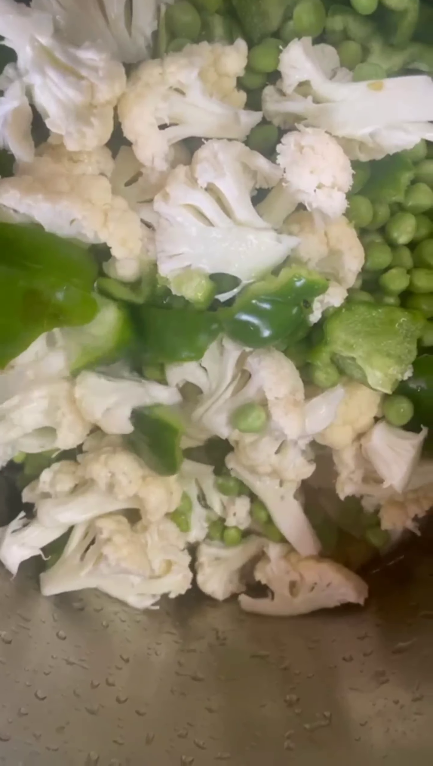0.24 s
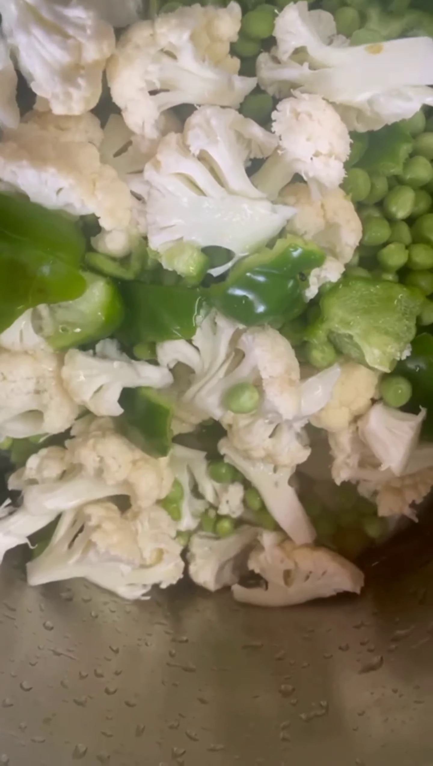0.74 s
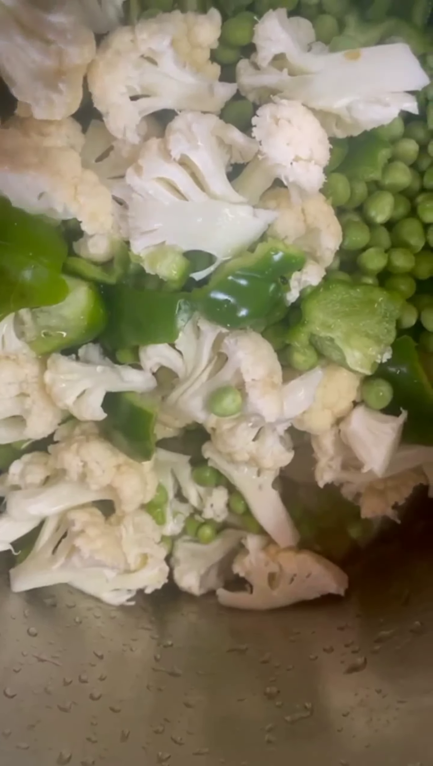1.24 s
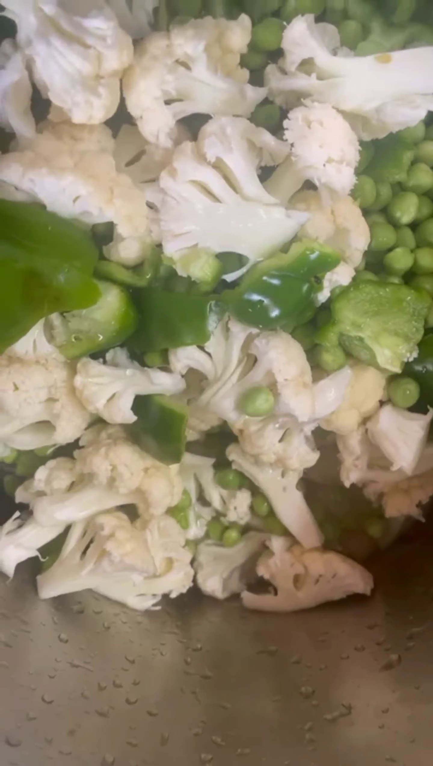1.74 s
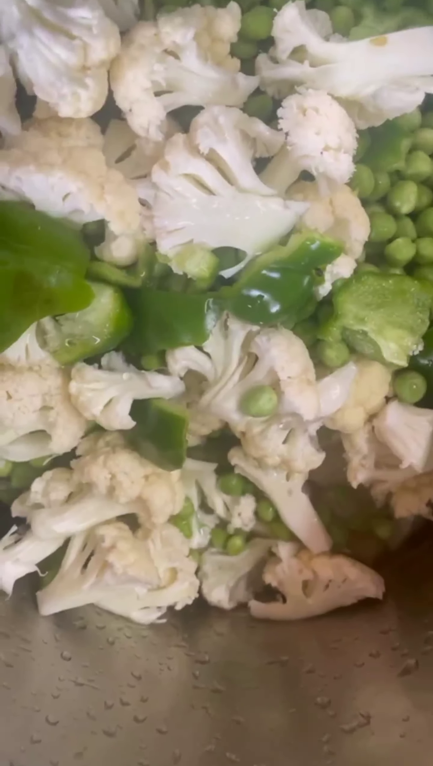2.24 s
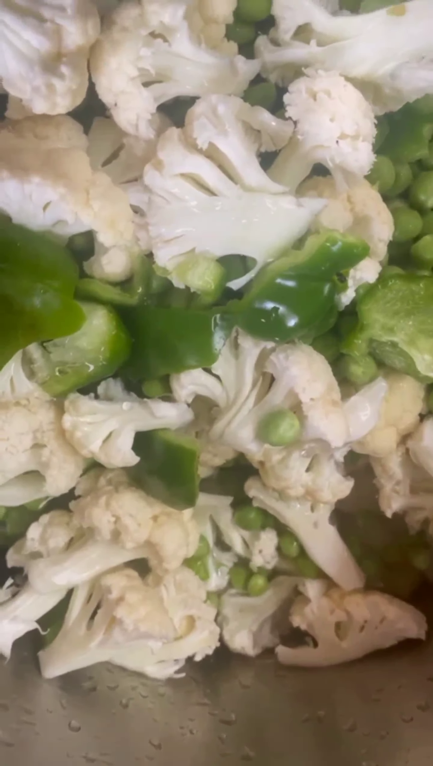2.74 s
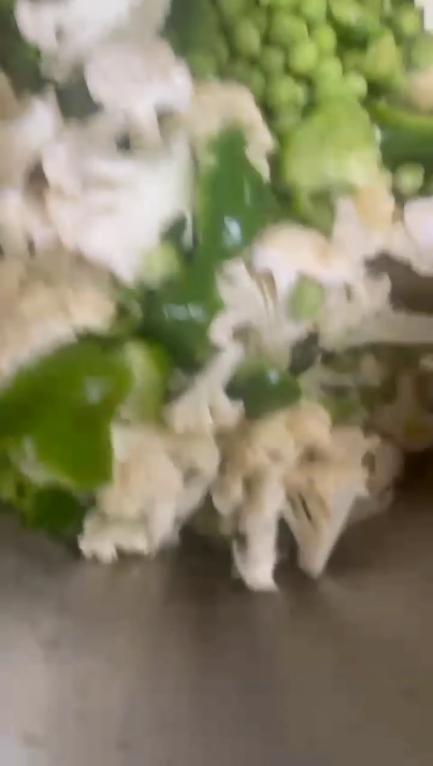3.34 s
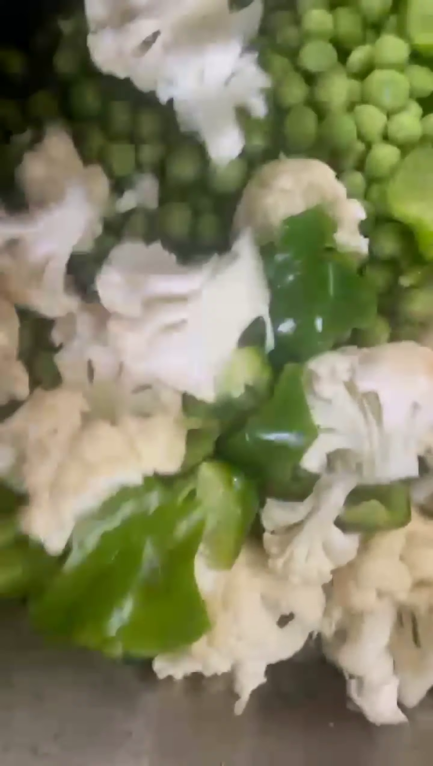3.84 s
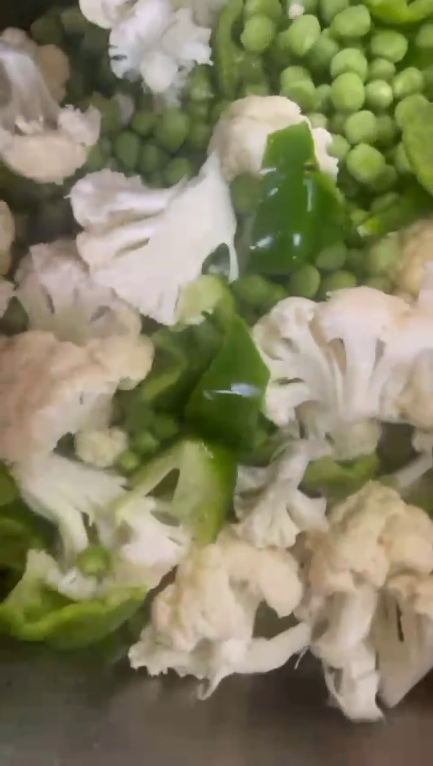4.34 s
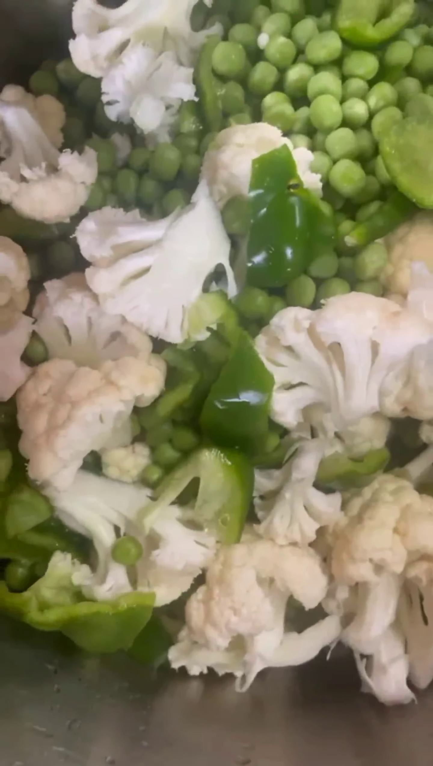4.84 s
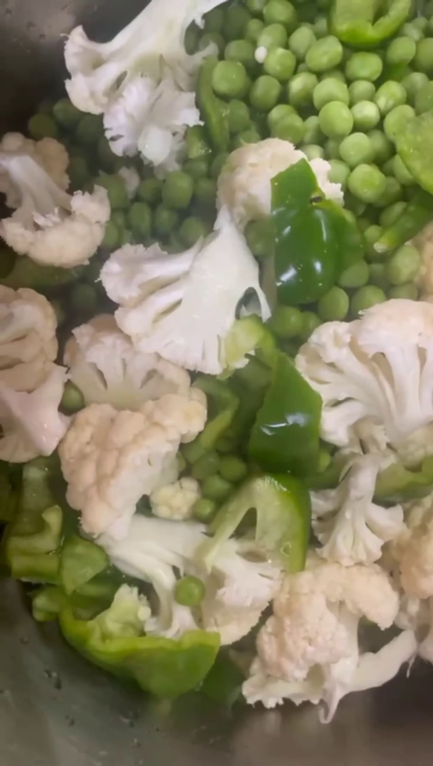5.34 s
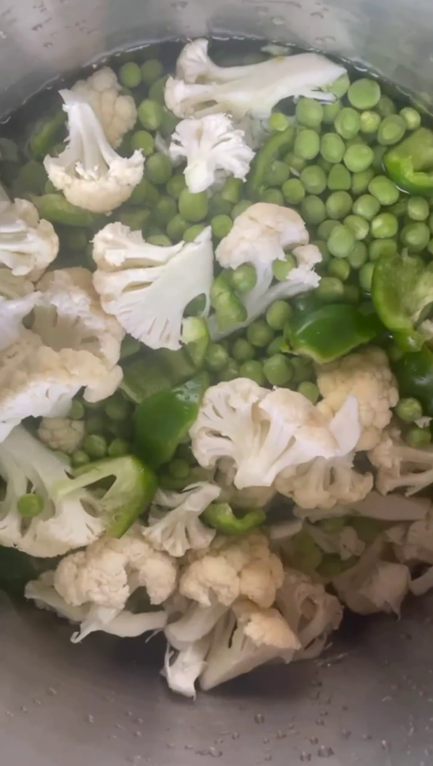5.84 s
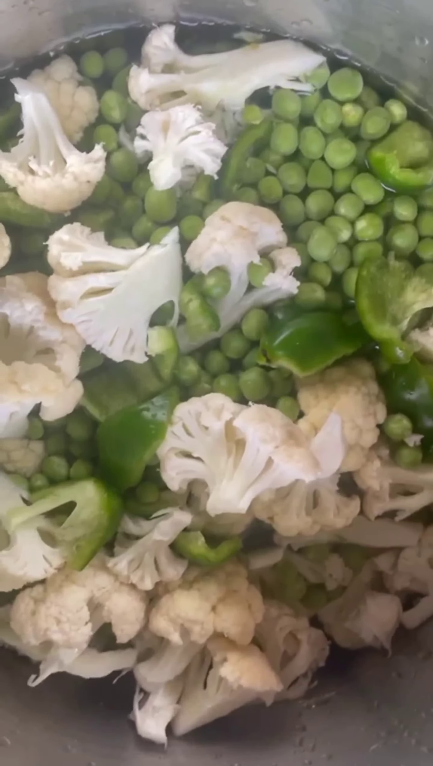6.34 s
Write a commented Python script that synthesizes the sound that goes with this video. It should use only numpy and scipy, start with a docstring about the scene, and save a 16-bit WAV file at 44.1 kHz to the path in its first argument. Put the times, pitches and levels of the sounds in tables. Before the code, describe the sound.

In a small kitchen, a low burner hum runs throughout. Water splashes onto vegetables in a steel pot in quick gushes with bubbly drips, then trickles away. Two steel utensils clank onto the worktop. Fingers bump and rub the close microphone while a dragged vessel sings with a wavering metallic ring. After a momentary silence, a faint sizzle with tiny wet chirps remains.

```python
"""Water splashes onto vegetables in a steel pot in a small kitchen, with a burner's hum (filtered noise) underneath.
The water (noise, ringing bubbles, single drops) stops and trickles away; a few short ticks come later. Two steel
utensils, sums of damped modes, are put down on the worktop. Fingers excite the low resonances of the microphone's
case at its two ports, while a dragged steel vessel sings in beating pairs of sines. The sound drops out for an
instant and comes back with a faint sizzle: clumped noise and small falling chirps."""
import sys
import numpy as np
from scipy import signal
from scipy.fft import rfft, irfft, next_fast_len
from scipy.io import wavfile
from scipy.ndimage import uniform_filter1d

SR = 44100
rng = np.random.default_rng(int(sys.argv[2]) if len(sys.argv) > 2 else 0)


def master(y):
    """Save y as 16-bit WAV."""
    cut = np.clip(np.atleast_2d(y).T, -1, 1)
    pcm = np.round(cut * 32767)  # scale
    wavfile.write(sys.argv[1], SR, pcm.astype(np.int16))


N = 289734
SIZE = next_fast_len(N + SR // 10, True)   # transform length, padded
TIME, FREQS = np.arange(N) / SR, np.fft.rfftfreq(SIZE, 1 / SR)


def from_db(db):
    """Decibels to gain."""
    return 10 ** (np.asarray(db) / 20)


def rms_one(x):
    """Scale to unit rms."""
    return x / np.sqrt(np.mean(x ** 2) + 1e-20)


def gain_curve(rows):
    """Gain through (time, level) points, silent from 60 ms outside their span."""
    times, levels = np.transpose(rows)
    distance_inside = np.minimum(TIME - times[0], times[-1] - TIME)
    inside = np.clip(distance_inside / .03 + 2, 0, 1)
    return inside * from_db(np.interp(TIME, times, levels))


def envelope(rows, rise_db_per_s, fall_db_per_s):
    """Each (start, end, level) row rises, holds and dies away; overlapping rows add in power."""
    power = 0
    for start, end, db in rows:
        before = rise_db_per_s * np.maximum(start - TIME, 0)
        after = fall_db_per_s * np.maximum(TIME - end, 0)
        power = power + from_db(db - before - after) ** 2
    return np.sqrt(power)


def shape(points):
    """Gain at every frequency from (frequency, level) points."""
    hz, db = np.transpose(points)
    return from_db(np.interp(np.log(FREQS + 1), np.log(hz), db))


def colour(x, points):
    """Give x a spectrum that falls steeply past both ends; rms 1."""
    low_end = 1 + (points[0][0] / (FREQS + 1)) ** 8
    high_end = 1 + (FREQS / points[-1][0]) ** 8
    spectrum = rfft(x, SIZE) * shape(points) / np.sqrt(low_end * high_end)
    return rms_one(irfft(spectrum, SIZE)[..., :N])


def noise(points):
    """Two unrelated noises of one spectrum."""
    return colour(rng.standard_normal((2, N)), points)


def clumped(x, spread_db):
    """Grains come in clumps: random swells a few milliseconds long and a few hundred Hz wide; rms 1."""
    cells = signal.stft(x, nperseg=256)[2]
    swells = rng.standard_normal(cells.shape[1:])
    swells = uniform_filter1d(swells, size=4, axis=0)   # over frequency
    swells = uniform_filter1d(swells, size=5, axis=1)   # over time
    cells = cells * from_db(spread_db * rms_one(swells))
    return rms_one(signal.istft(cells, nperseg=256)[1][:, :N])


def drift(rate_hz):
    """Slow chance with spread 1: noise through two equal low-pass poles, one value per 40 samples."""
    r = np.exp(-80 * np.pi * rate_hz / SR)
    slow = signal.lfilter([1], [1, -2 * r, r * r], rng.standard_normal(N // 40 + 2002))
    slow = slow[2000:]   # leave out the filter's start
    return np.interp(np.arange(N) / 40, np.arange(len(slow)), rms_one(slow))


def band(x, low_hz, high_hz, order=2):
    """Causal band-pass."""
    edges = [low_hz, min(high_hz, SR / 2 - 100)]
    return signal.sosfilt(signal.butter(order, edges, "band", fs=SR, output="sos"), x + 1e-18)


def ring(clicks, hz, t60):
    """A unit click sets a sine of height 1 ringing, 60 dB down after t60 seconds."""
    r, w = 1e-3 ** (1 / (t60 * SR)), 2 * np.pi * hz / SR
    return signal.lfilter([0, np.sin(w)], [1, -2 * r * np.cos(w), r * r], clicks + 1e-18)


def fade(clicks, t60):
    """Each click starts an exponential decay, 60 dB down after t60 seconds."""
    return signal.lfilter([1], [1, -1e-3 ** (1 / (t60 * SR))], clicks + 1e-18)


def strikes(s, db):
    """One second of clicks at the given times and levels."""
    return np.bincount(np.round(s * SR).astype(int), from_db(db), SR)


def grains(per_s, spread_db):
    """Random clicks of uneven size and sign."""
    present = rng.random(N) < per_s / SR
    size = from_db(spread_db * np.minimum(rng.exponential(1, N), 4))
    return present * size * rng.choice([-1, 1], N)


def pings(rows, snap_db, snap_t60):
    """Each (time, level, pitch, t60) row is a short damped tone with a bright snap at its start."""
    out, t = np.zeros((2, N)), TIME[:SR // 10]
    for s, db, hz, t60 in rows:
        tone = np.sin(2 * np.pi * hz * t) * fade(t == 0, t60)
        snap = from_db(snap_db) * rng.standard_normal((2, len(t))) * fade(t == 0, snap_t60)
        i = round(s * SR)
        out[:, i:i + len(t)] += from_db(db) * (tone * [[1], [rng.uniform(-1, 1)]] + snap)
    return band(out, 900, 15300)


# spectra of the burner's hum and roar: (frequency [Hz], relative level [dB per Hz])
HUM_SPECTRUM = [(25, -18.5), (40, -25.5), (52, -13), (66, 1), (80, -8.5), (105, -10.5), (130, -26),
                (175, -49)]
ROAR_SPECTRUM = [(130, 8.5), (175, -6), (225, 0.5), (320, -2.5), (450, -2), (560, -10.5), (740, -11.5),
                 (1100, -16), (1900, -18.5), (2700, -29.5), (5000, -33), (6800, -56.5)]
# the low hum swells once: (start [s], end [s], level [dB])
HUM_SWELL = [(4.9, 5.03, -32.5)]
HUM_RISE_DB_PER_S, HUM_FALL_DB_PER_S = 30.5, 200
HUM_DB, HUM_WAVER_DB, ROAR_DB = -35, 1.56, -43


def burner():
    """Under the pot: low noise held to an even level that then wavers, with a soft, steady noise roar."""
    swell = envelope(HUM_SWELL, HUM_RISE_DB_PER_S, HUM_FALL_DB_PER_S)
    hum_gain = np.hypot(from_db(HUM_DB + HUM_WAVER_DB * drift(3.3)), swell)
    hum = noise(HUM_SPECTRUM)
    hum = hum / np.sqrt(uniform_filter1d(hum ** 2, size=SR // 5, axis=1))   # even out its own swells
    return hum_gain * hum + from_db(ROAR_DB) * noise(ROAR_SPECTRUM)


# spectrum of the sizzle: (frequency [Hz], relative level [dB per Hz])
SIZZLE_SPECTRUM = [(900, 3.5), (1250, 1.5), (1800, -2.5), (3400, -3), (4500, -9.5), (6000, -9),
                   (7000, -21.5), (8500, -75), (10000, -20.5), (11200, -13), (12500, -30)]
# spells of simmering at the pot's wall: (start [s], end [s], sizzle level [dB])
SIMMER_SPELLS = [(1.6, 2.35, -53.5), (2.92, 3.0, -54), (4.4, 5.35, -61), (5.49, 6.57, -51.5)]
SPELL_RISE_DB_PER_S, SPELL_FALL_DB_PER_S = 108, 38
# small wet chirps in the pot: (middle time [s], peak level [dB], pitch [Hz], half length [s])
WET_CHIRPS = [(5.533, -49.5, 3750, 0.029), (5.585, -48, 3270, 0.0089), (5.725, -54, 3180, 0.0086),
              (5.766, -47, 3260, 0.011), (5.821, -49.5, 3660, 0.03), (5.907, -49, 3220, .01),
              (5.951, -44, 3260, 0.0073), (6.1, -47, 3280, .01), (6.136, -46, 3420, 0.022),
              (6.421, -52, 3500, .025)]


def simmer(fall_per_s, flutter_hz):
    """In the pot: a faint sizzle of clumped noise, with small fluttering chirps that fall in pitch."""
    heat = envelope(SIMMER_SPELLS, SPELL_RISE_DB_PER_S, SPELL_FALL_DB_PER_S)
    sizzle = clumped(noise(SIZZLE_SPECTRUM), spread_db=2.5)
    chirps, flutter = np.zeros(N), flutter_hz * drift(246)
    for s, db, hz, half in WET_CHIRPS:
        near = np.abs(TIME - s) < 3 * half
        t = TIME[near] - s
        pitch = hz * np.exp(-fall_per_s * t) + flutter[near]
        tone = np.sin(2 * np.pi * np.cumsum(pitch) / SR)
        chirps[near] += from_db(db) * np.exp(-(t / half) ** 2) * tone
    return heat * sizzle + chirps


def bubbles(per_s, spread_db, cycles):
    """Tiny bubbles, each ringing at one of 24 pitches and 60 dB down after the given cycles."""
    born, dealt = grains(per_s, spread_db), rng.integers(0, 24, N)
    pitches = np.geomspace(1500, 11500, 24) * from_db(rng.normal(0, .2, 24))
    rings = np.array([ring(born * (dealt == k), hz, cycles / hz) * hz for k, hz in enumerate(pitches)])
    signs = rng.choice([-1, 1], len(pitches))   # the second version flips some pitches
    return rms_one(np.array([rings.sum(0), signs @ rings]))


def drips(start_s, end_s, db, low_hz, high_hz, t60, count):
    """Small drops at random times, sizes and pitches, as (time, level, pitch, t60) rows."""
    rows = []
    for when, size, pitch in rng.random((count, 3)):
        s = max(start_s + when * (end_s - start_s), 0)
        level = db + DRIP_SPREAD_DB * (2 * size - 1)
        rows.append((s, level, low_hz + pitch * (high_hz - low_hz), t60))
    return rows


# spectrum of the splashing water: (frequency [Hz], relative level [dB per Hz])
SPLASH_SPECTRUM = [(900, 10), (1400, -1), (2000, -4.5), (2800, 0), (3600, -1), (4500, 2), (6900, -3.5),
                   (8200, -49), (9500, -21), (11200, 0), (12500, -31)]
# the loudest drops and short ticks: (time [s], relative level [dB], pitch [Hz], t60 [s])
DROPS_AND_TICKS = [(0.0712, -33, 4800, .008), (0.1372, -27.5, 2760, 0.049), (0.2142, -13, 4360, 0.012),
                   (0.2234, -21.5, 5500, .006), (0.2653, -15, 4170, 0.0019), (0.288, -26.5, 2730, 0.02),
                   (0.3578, -28, 2760, 0.034), (0.376, -33, 4730, 0.061), (0.4174, -28, 5740, 0.004),
                   (0.5598, -29.5, 2810, 0.058), (0.6704, -18, 3720, 0.0025), (0.782, -37, 5600, 0.011),
                   (0.9288, -34, 5900, 0.0019), (0.995, -38, 2870, 0.024), (3.4356, -24, 3600, 0.0028),
                   (4.6213, -37, 4840, 0.0091), (4.8327, -36.5, 4800, 0.0028), (5.2644, -34, 5800, 0.0012)]
# the water comes in gushes: (start [s], end [s], relative splash level [dB])
WATER_GUSHES = [(0.02, 0.2, -41), (0.268, 0.285, -36.5), (0.4, 0.59, -38.5), (0.669, 0.674, -47)]
GUSH_RISE_DB_PER_S, GUSH_FALL_DB_PER_S = 330, 211
# then it trickles away between the vegetables, with stray drips
TRICKLE_START_S, TRICKLE_END_S, TRICKLE_DB, TRICKLE_FALL_DB_PER_S = 0.7, 1.45, -55, 5
DRIP_SPREAD_DB = 3   # either way


def water():
    """The stream hits the vegetables: spray, bubble fizz, sharp crackle; single drops and short ticks on top."""
    trickle = envelope([(TRICKLE_START_S, TRICKLE_END_S, TRICKLE_DB)], GUSH_RISE_DB_PER_S, GUSH_FALL_DB_PER_S)
    trickle = trickle * from_db(-TRICKLE_FALL_DB_PER_S * (TIME - TRICKLE_START_S))
    gushes = envelope(WATER_GUSHES, GUSH_RISE_DB_PER_S, GUSH_FALL_DB_PER_S)
    flow = np.hypot(gushes, trickle)
    fizz = colour(bubbles(per_s=2000, spread_db=4, cycles=36), SPLASH_SPECTRUM)
    crackle = colour(bubbles(per_s=350, spread_db=4, cycles=7), SPLASH_SPECTRUM)
    spray = clumped(noise(SPLASH_SPECTRUM), spread_db=4)
    splash = flow * (from_db(-5.5) * (fizz + .7 * crackle) + from_db(-6) * spray)
    spatter = drips(start_s=0.023, end_s=0.62, db=-34.5, low_hz=1700, high_hz=5500, t60=0.021, count=26)
    stray = drips(TRICKLE_START_S, TRICKLE_END_S, db=-40, low_hz=3000, high_hz=6000, t60=0.014, count=6)
    drops_and_ticks = pings(DROPS_AND_TICKS + spatter + stray, snap_db=-15, snap_t60=0.012)
    return splash + from_db(-1.5) * drops_and_ticks


# contacts of each utensil put down: (time [s], relative thud level [dB], relative ring level [dB])
LADLE_CONTACTS = [(1.8866, 4, 1.5), (1.8935, -15, -1), (1.8985, -5, -22.5)]
SPOON_CONTACTS = [(2.1552, -1, -29), (2.1595, 1.5, -6.5), (2.1635, -14, 0.5), (2.168, -22, -15)]
# steel modes of each utensil: (frequency [Hz], relative level [dB], t60 [s])
LADLE_MODES = [(464, -38, 0.45), (598, -33.5, 0.46), (907, -24, 0.3), (1062, -21.5, 0.19),
               (1487, -29.5, 0.25), (2277, -22, 0.22), (2355, -29, 0.21), (2540, -36, 0.45),
               (3229, -22, 0.2), (3324, -18.5, 0.19), (3355, -31, 0.26), (3919, -35.5, 0.24),
               (4850, -26, 0.22), (5140, -19, 0.2), (5570, -45, 0.3), (6000, -34, 0.12), (6330, -23, 0.12),
               (7000, -16.5, 0.089)]
SPOON_MODES = [(510, -40, 0.33), (662, -24.5, 0.28), (900, -33.5, 0.33), (1110, -23, 0.091),
               (1300, -36, .27), (2040, -32, 0.29), (2124, -16, 0.11), (2540, -32.5, 0.31),
               (2625, -19, 0.11), (2924, -26, .16), (3870, -14.5, 0.15), (3920, -19, 0.18),
               (4350, -43.5, 0.87), (4830, -18.5, 0.059), (4740, -32, .09), (6170, -27, 0.36),
               (6500, -31.5, 0.19), (7040, -35, 0.18)]
# modes of the worktop's thud: (frequency [Hz], relative level [dB], t60 [s])
WORKTOP_MODES = [(156.4, -26.5, 0.2), (205.7, -19, 0.12), (257, -8, 0.04), (303, -14.5, 0.087),
                 (468, -17, 0.045), (533, -15.5, 0.048), (658, -17, 0.049), (840, -20, 0.031),
                 (1156, -12.5, 0.012)]
# spectrum of the crack and of the kitchen's answer: (frequency [Hz], relative level [dB per Hz])
CLATTER_SPECTRUM = [(71, -39), (120, -23.5), (195, 6.5), (906, -12), (1260, -17.5), (2800, -17.5),
                    (3270, -16.5), (3600, -20), (3890, -23), (6710, -23), (8810, -88), (10100, -31.5),
                    (11600, -30.5), (12500, -48), (16200, -86), (22000, -120)]


def put_down(hits, modes, thud_db, ring_db, crack_db, room_db, room_t60):
    """A utensil lands in a few quick contacts: the worktop thuds, the steel rings, the kitchen answers."""
    s, thud, bright = np.transpose(hits)
    first = s.min()
    soft, hard = strikes(s - first, thud), strikes(s - first, bright)
    board, steel, crowd = 0, 0, 0
    for k, (hz, db, t60) in enumerate(WORKTOP_MODES):
        board = board + ring(soft, hz, t60) * from_db(db) * [[(-1) ** k], [rng.choice([-1, 1])]]
    for hz, db, t60 in modes:
        steel = steel + ring(hard, hz, t60) * from_db(db) * [[1], [rng.choice([-1, 1])]]
    # a crowd of faint resonances in the things around carries the tail
    clatter_gain = shape(CLATTER_SPECTRUM)
    for hz in np.geomspace(300, 7000, 110) * from_db(rng.normal(0, .1, 110)):
        strength = np.interp(hz, FREQS, clatter_gain) * np.sqrt(hz)
        crowd = crowd + ring(soft, hz, room_t60) * strength * rng.normal(0, 1, (2, 1))
    crack_fade = fade(soft, t60=0.031) + from_db(-10.0) * fade(soft, t60=0.25)
    crack = crack_fade * noise(CLATTER_SPECTRUM)[:, :SR]
    body = from_db(thud_db) * board + from_db(ring_db) * steel + from_db(room_db) * rms_one(crowd)
    out, i = np.zeros((2, N)), round(first * SR)
    out[:, i:i + SR] = band(body, 44, 5540, order=6) + from_db(crack_db) * crack
    return out


# the vessel's wall: (frequency [Hz], relative level [dB], t60 [s], beat of the pair [Hz])
WALL_TONES = [(2830, 0, 2, 28), (3228, -5.5, 1.4, 22), (2450, -17, 2.5, 16)]
# pulls that make it sing: (start [s], end [s], level [dB], tilt toward its higher tones [dB per kHz])
VESSEL_PULLS = [(3.667, 3.82, -38.5, -9), (3.86, 3.885, -33.5, 0), (4.068, 4.152, -37, 1),
                (4.217, 4.257, -43.5, -15), (4.327, 4.383, -34, 2)]
PULL_RISE_DB_PER_S, PULL_FALL_DB_PER_S = 299.5, 156
RING_OUT_DB, PULL_SHARPENS_HZ = -9.5, 12
PAIR_DB = -7.5   # the lower partner of each tone
# it catches on the worktop and comes to rest: (time [s], relative level [dB], pitch [Hz], t60 [s])
VESSEL_CATCHES = [(3.390, -22.5, 1320, 0.0056), (3.7215, -28, 1880, .008), (3.977, -27, 1920, 0.021),
                  (4.002, -28, 4730, 0.0097), (4.0435, -28.5, 5620, 0.016), (4.4015, -13, 1700, 0.0057)]


def vessel(wander_hz, flutter_db):
    """Dragged on the worktop: friction keeps the steel singing, then it rings out in close, beating pairs."""
    out = 0
    for hz, db, t60, split_hz in WALL_TONES:
        above_khz = (hz - WALL_TONES[0][0]) / 1000
        pulls = [(start, end, pull_db + tilt * above_khz) for start, end, pull_db, tilt in VESSEL_PULLS]
        pull = envelope(pulls, PULL_RISE_DB_PER_S, PULL_FALL_DB_PER_S)
        free = from_db(RING_OUT_DB) * envelope(pulls, PULL_RISE_DB_PER_S, 60 / t60)
        level = np.hypot(pull, free) + 1e-12
        pitch = hz + PULL_SHARPENS_HZ * pull / level + wander_hz * drift(19.6)
        phase = 2 * np.pi * np.cumsum(pitch) / SR
        beat_phase = 2 * np.pi * np.cumsum(split_hz + wander_hz * drift(9.03)) / SR
        pair = np.sin(phase) + from_db(PAIR_DB) * np.sin(phase - beat_phase)
        out = out + level * from_db(db + flutter_db * np.tanh(drift(17.5))) * pair
    return out * [[1], [.6]] + pings(VESSEL_CATCHES, snap_db=-46, snap_t60=0.023)


# resonances of the microphone's case: (frequency [Hz], width [Hz], relative level [dB])
CASE_MODES = [(329.4, 22.5, 0.5), (409.3, 18, -2), (450.6, 25, 0), (508, 36, -3), (586, 31, -5.5)]
# the strongest slips and bumps: (time [s], relative level [dB], pitch [Hz], time to swell [s])
STRONG_SLIPS = [(3.128, -22.5, 582, 0.0038), (3.129, -18.5, 337, 0.0034), (3.277, -7.5, 468, 0.0038),
                (3.346, -9.5, 421, 0.0085), (3.499, -9.5, 457, 0.0034), (3.540, -12.5, 513, 0.0062),
                (3.638, -10.5, 442, 0.0042), (3.793, -9, 455, 0.0047), (3.890, -9, 463, 0.0042),
                (3.9158, -10, 447, 0.0046), (3.936, -13, 324, 0.024), (4.043, -7.5, 448, 0.004),
                (4.141, -11, 410, 0.0043), (4.258, -18, 410, 0.0087), (4.2927, -1.5, 418, 0.003),
                (4.302, -10, 424, 0.0042), (4.3498, -1, 450, 0.0021), (4.357, -11.5, 450, 0.0036)]
# strokes on the case: (start [s], end [s], relative thrum level [dB], relative rasp level [dB])
FINGER_STROKES = [(3.253, 3.373, -19, -44), (3.508, 3.552, -15, -33.5), (3.643, 3.688, -19.5, -48.5),
                  (3.798, 3.823, -17, -36.5), (3.901, 3.946, -15.5, -42), (4.026, 4.147, -18, -49.5),
                  (4.284, 4.401, -28, -48.5)]
STROKE_RISE_DB_PER_S, STROKE_FALL_DB_PER_S = 223, 249.5
# the dry scratch over time: (time [s], relative level [dB])
SCRATCH_LEVELS = [(3.1, -80), (3.272, -44), (3.462, -60), (3.532, -39.5), (3.568, -51), (4.04, -47),
                  (4.222, -63), (4.38, -53.5), (4.55, -68)]
# spectra of the dry skin's rasp and scratch: (frequency [Hz], relative level [dB per Hz])
RASP_SPECTRUM = [(700, -7.5), (880, -2), (970, 10), (1060, 0), (1180, 0.5), (1450, -15.5), (1900, -8.5),
                 (2500, -13.5), (3200, -16.5)]
SCRATCH_SPECTRUM = [(1200, 0.5), (1550, -7), (1900, -1), (2500, -4), (3600, -6.5), (5000, -7), (7200, -14),
                    (8200, -57.5), (9500, -23.5), (11100, -11.5), (12500, -40)]


def fingers(slip_db, thrum_db, rasp_db, scratch_db, leak_db):
    """On the microphone itself: skin sticks and slips, and the case's low resonances carry it to the ports."""
    press_rows = [(start, end, db) for start, end, db, _ in FINGER_STROKES]
    rasp_rows = [(start, end, db) for start, end, _, db in FINGER_STROKES]
    press = envelope(press_rows, STROKE_RISE_DB_PER_S, STROKE_FALL_DB_PER_S)
    rasp = envelope(rasp_rows, STROKE_RISE_DB_PER_S, STROKE_FALL_DB_PER_S)
    slips = grains(per_s=600, spread_db=2)
    body = 0
    for k, (hz, width, db) in enumerate(CASE_MODES):
        t60 = np.log(1000) / np.pi / width   # a wider resonance dies sooner
        body = body + (-1) ** k * from_db(db) * np.sqrt(width) * ring(slips, hz, t60)
    leak = rms_one(band(slips, 150, 240))
    body = rms_one(band(body, 263, 609, order=6)) + from_db(leak_db) * leak
    # an even level, so that the press alone sets the loudness
    body = press * body / np.sqrt(uniform_filter1d(body ** 2, size=SR // 30) + 1e-12)
    bumps, gripped = np.zeros(N), np.zeros(N)
    for s, db, hz, swell_s in STRONG_SLIPS:   # a soft fingertip: the tone swells and dies
        t, i = TIME[:SR // 5], round(s * SR)
        swell = (t / swell_s * np.exp(1 - t / swell_s)) ** 3
        bumps[i:i + len(t)] += from_db(db) * swell * np.sin(2 * np.pi * hz * t)
        gripped[i:i + len(t)] += swell
    # one large slip takes the place of the small ones
    thrum = from_db(thrum_db) * body / (1 + gripped) + from_db(slip_db) * bumps
    # the dry scratch comes in uneven clumps
    grit = gain_curve(SCRATCH_LEVELS) * clumped(noise(SCRATCH_SPECTRUM), spread_db=4)
    dry_skin = from_db(rasp_db) * rasp * noise(RASP_SPECTRUM) + from_db(scratch_db) * grit
    return thrum * [[1], [.6]] + dry_skin * from_db(1.7 * drift(32))


# difference between the microphone's two ports: (frequency [Hz], side gain against mid [dB])
PORT_WIDTH = [(30, -18.5), (60, -46), (110, -38.5), (200, -20.5), (400, -15.5), (700, -7.5), (1200, -4.5),
              (2100, -7), (3100, -2), (3900, -17.5), (5300, -14), (6200, -0.5), (7000, 12.5), (8200, 27.5),
              (9500, 23.5), (10600, -2), (11800, -13)]
# the left port hears the lower mids louder: (frequency [Hz], left against right [dB])
PORT_TILT = [(60, 0), (110, .3), (350, 2), (1200, 2.5), (2100, 0), (12000, 0)]


def ports(pair):
    """Two versions of a sound become left and right: in step in the bass, least alike around 7 to 9.5 kHz."""
    mid, side = rfft(pair, SIZE)
    side = 1j * side * shape(PORT_WIDTH)   # a quarter turn of phase
    lean = np.sqrt(shape(PORT_TILT))
    return irfft([(mid + side) * lean, (mid - side) / lean], SIZE)[:, :N]


def scene():
    """All sources in the kitchen reach the microphone's two ports."""
    background = burner() + simmer(fall_per_s=3.5, flutter_hz=298)
    ladle = put_down(LADLE_CONTACTS, LADLE_MODES, thud_db=-3.5, ring_db=-1.5, crack_db=-16.5,
                     room_db=-41, room_t60=0.32)
    spoon = put_down(SPOON_CONTACTS, SPOON_MODES, thud_db=0, ring_db=-2.0, crack_db=-15.5,
                     room_db=-38.5, room_t60=0.25)
    singing = vessel(wander_hz=6.68, flutter_db=5.0)
    handling = fingers(slip_db=0.5, thrum_db=-2, rasp_db=-3, scratch_db=6.0, leak_db=-20)
    return ports(background + water() + ladle + spoon + singing + handling)


# the silent instant: (start [s], end [s])
DROPOUT_SPAN = (5.460, 5.492)
CUTOFF_HZ = 12300


def record(dry):
    """The sound drops out for an instant, peaks are clipped and the top is cut by a steep low-pass."""
    outside = (TIME < DROPOUT_SPAN[0]) | (TIME > DROPOUT_SPAN[1])
    live = uniform_filter1d(1.0 * outside, size=24)   # edges half a millisecond long
    low_pass = signal.ellip(10, .3, 80, CUTOFF_HZ, fs=SR, output="sos")
    return signal.sosfilt(low_pass, np.clip(dry * live, -1, 1))


dry = scene()
out = record(dry)
master(out)
```